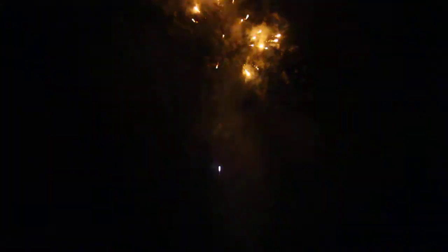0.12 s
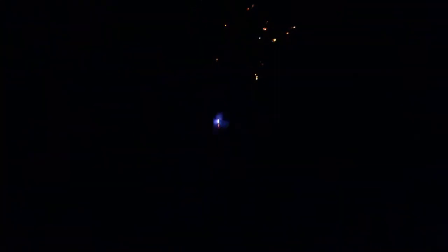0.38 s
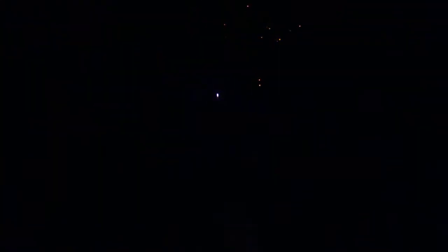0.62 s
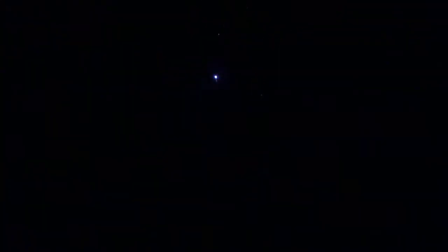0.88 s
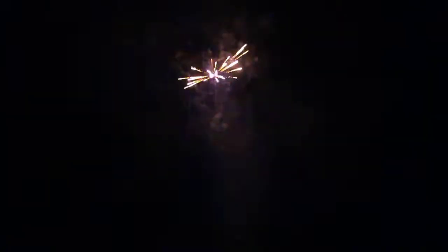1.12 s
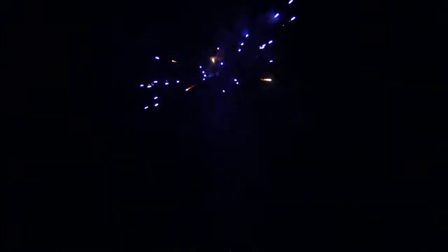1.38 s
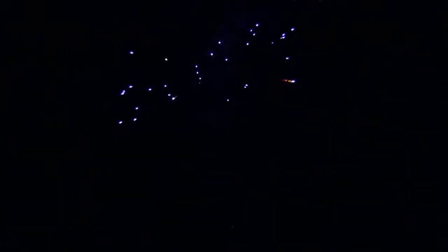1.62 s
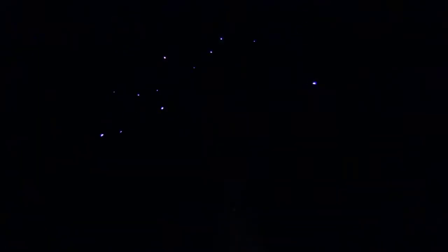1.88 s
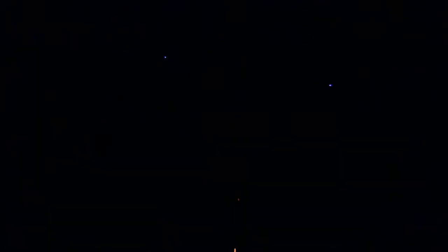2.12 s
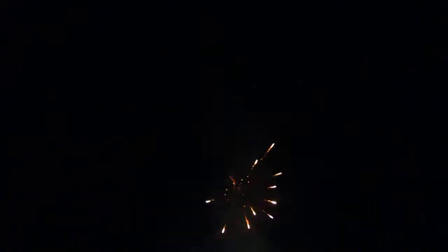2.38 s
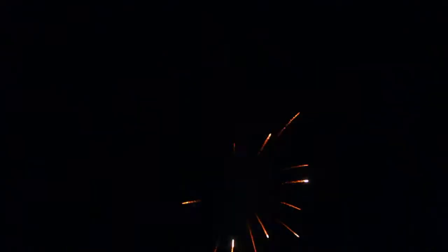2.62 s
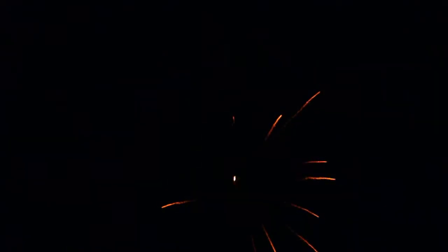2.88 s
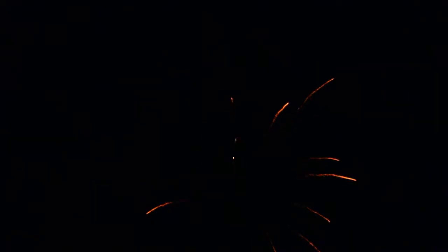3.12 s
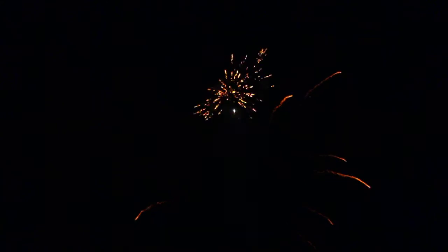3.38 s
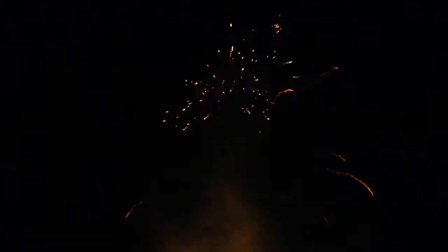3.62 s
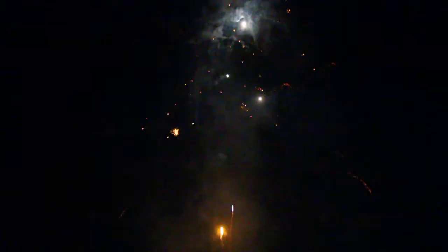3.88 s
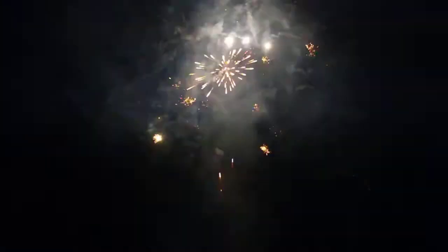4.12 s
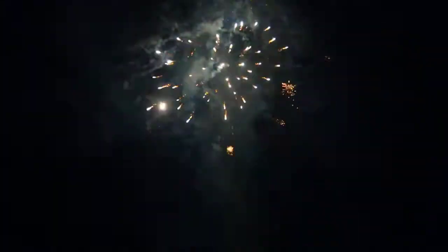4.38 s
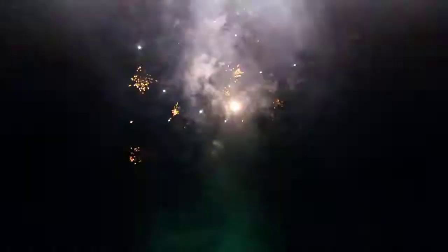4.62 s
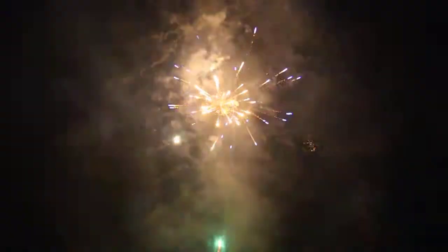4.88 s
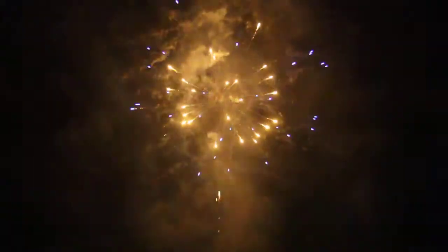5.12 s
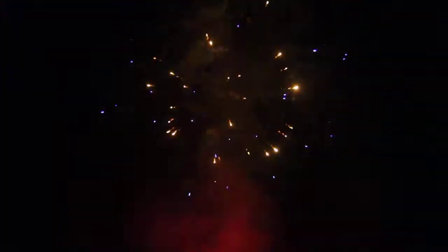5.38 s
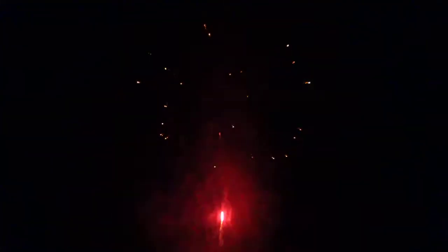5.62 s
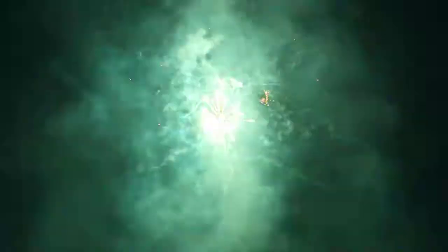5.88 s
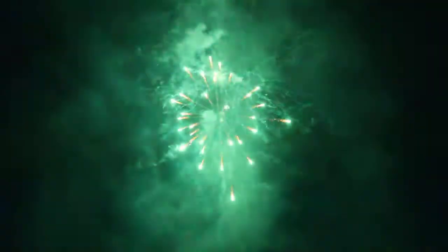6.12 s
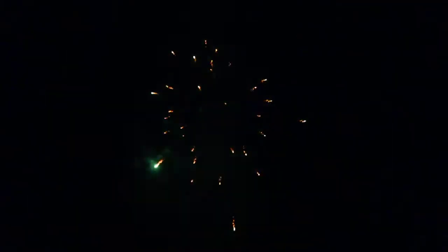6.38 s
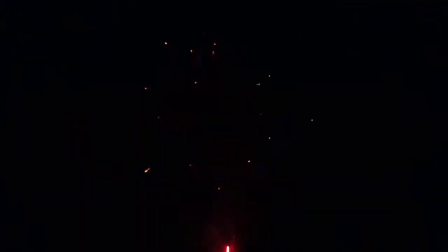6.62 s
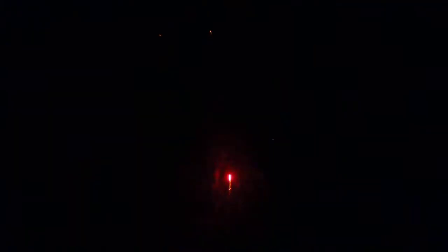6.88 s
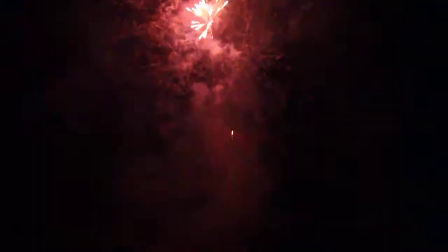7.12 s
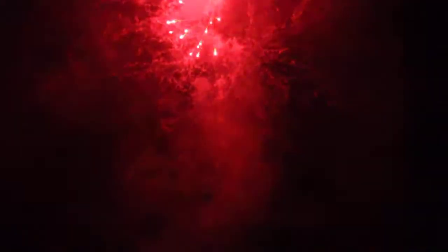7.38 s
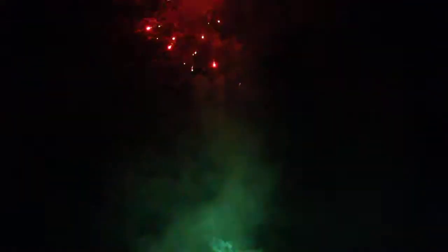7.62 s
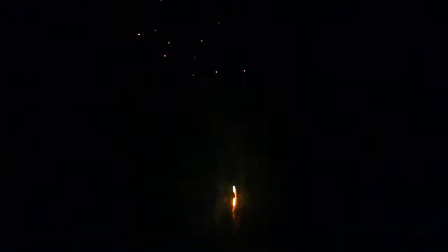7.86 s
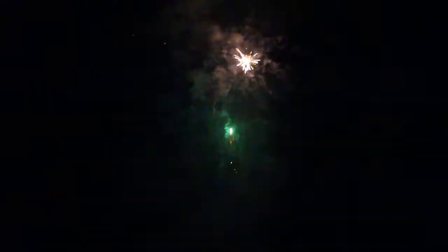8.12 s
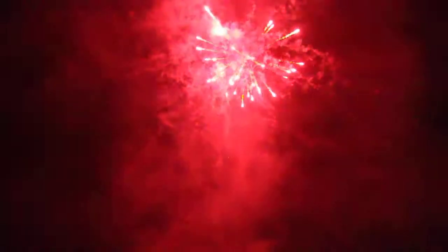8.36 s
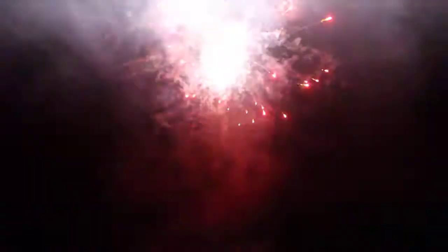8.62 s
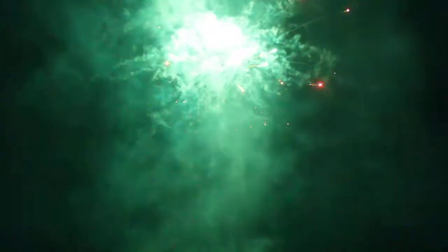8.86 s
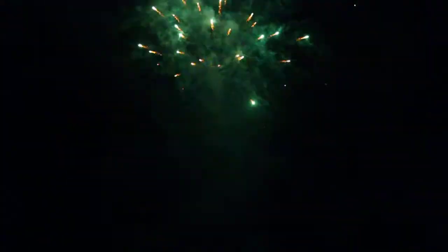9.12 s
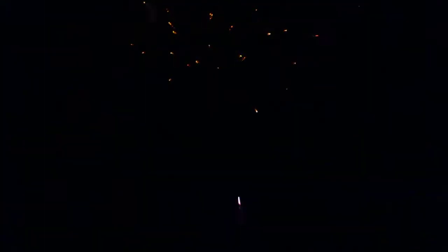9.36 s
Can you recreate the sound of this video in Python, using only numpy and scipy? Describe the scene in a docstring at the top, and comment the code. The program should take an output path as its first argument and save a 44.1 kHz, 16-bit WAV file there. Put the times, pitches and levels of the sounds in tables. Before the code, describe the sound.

Outdoor night fireworks heard close through a small overloading microphone. The roll of an earlier burst fades, then launch tubes thud and huge shells bang overhead, each with wall slaps, a quick falling metallic whistle off a fence and rolling echoes. A rapid crackle fills about four to nearly five seconds; weaker bursts, then stronger bangs, then a last thud.

```python
"""Night fireworks close to a small microphone: it opens on the roll of a shell that burst just before.
Then tubes some way off thud and shells burst overhead; each blast overloads the microphone, comes back off
ground and near walls, whistles down a ribbed fence, slaps off far walls and rolls round distant buildings.
Just before four seconds a volley of tiny sharp blasts crackles, densest until about 4.7 s.
Weaker bursts follow, then stronger ones again, and a last tube thuds over a steady night rumble and hiss."""
import sys
import numpy as np
from scipy import signal
from scipy.fft import rfft, irfft
from scipy.io import wavfile
from scipy.ndimage import uniform_filter1d

SR = 44100
rng = np.random.default_rng(int(sys.argv[2]) if len(sys.argv) > 2 else 0)


def unload_wav(signal):
    """Save mono or channel-first audio to the path in sys.argv[1] as 16-bit WAV at rate SR, clipped to [-1, 1]."""
    wavfile.write(
        sys.argv[1],
        SR,
        np.round(np.clip(np.atleast_2d(signal).T, -1, 1) * 32767).astype(np.int16),
    )


def attenuation_scalar(level_db):
    """Turn a level in dB into a linear amplitude multiplier (20 dB per decade)."""
    decades = np.asarray(level_db, float) / 20
    return 10 ** decades


N = 418509
LEAD = SR  # samples of run-up before the start, so earlier blasts can feed the echoes


def band(x, lo_hz, hi_hz, order=2):
    """Band-pass."""
    return signal.sosfilt(signal.butter(order, [lo_hz, min(hi_hz, SR / 2.2)], "band", fs=SR, output="sos"), x)


def train(s, gain, size=N + LEAD, lead=LEAD):
    """Impulses at times s, each shared between two samples."""
    out = np.zeros(size + 1)
    at = np.clip(np.asarray(s) * SR + lead, 0, size - 1)
    np.add.at(out, at.astype(int), gain * (1 - at % 1))
    np.add.at(out, at.astype(int) + 1, gain * (at % 1))
    return out[:size]


def ring(x, shape):
    """Convolve and keep the length."""
    return signal.oaconvolve(x, shape)[:len(x)]


def wander(size):
    """Random levels held for size samples and slewed."""
    held = np.repeat(rng.standard_normal((N + LEAD) // size + 1), size)
    return uniform_filter1d(held, size)[:N + LEAD]


# spectrum of the night air: f/Hz, relative level/dB per Hz
NIGHT_SPECTRUM = [(18, -69), (30, -66), (158, -9), (374, -42.5), (645, -13), (1090, -4.5), (3320, -5.5),
                  (15000, -40)]
NIGHT_DB = -47  # rms


def night():
    """Steady far-off rumble and hiss: white noise shaped in the spectrum."""
    hz = np.fft.rfftfreq(N + LEAD, 1 / SR)
    at, db = np.transpose(NIGHT_SPECTRUM)
    colour = attenuation_scalar(np.interp(np.log(hz + 1), np.log(at), db))
    x = irfft(rfft(rng.standard_normal(N + LEAD)) * colour, N + LEAD)
    return attenuation_scalar(NIGHT_DB) * x / x.std()


# groups of houses swell the roll up to their far wall, then it drops: t/s, build-up/s, level/dB
HOUSE_SWELLS = [(0.279, 0.029, 1.5), (.545, 0.13, -11.5)]
CLUTTER_S, CLUTTER_WIDE_S = .010, .004
STREET_S, STREET_RISE_S, STREET_DB, STREET_T60_S = 0.065, 0.0054, 5, 0.23
TOWN_DB, TOWN_T60_S, HILLS_DB = -2.5, 3.52, -18
LULL_DB = -17.5  # early echoes before the street answers, relative to its level


def scatter(t):
    """Echo power t seconds after a blast: close clutter, then the street, and the swells of far houses."""
    def gate(at, rise):
        return 1 / (1 + np.exp(np.clip((at - t) / rise, -50, 50)))

    def fading(db, t60):
        return attenuation_scalar(2 * (db - 60 * (t - STREET_S) / t60))

    clutter = np.exp(-((t - CLUTTER_S) / CLUTTER_WIDE_S) ** 2 / 2)
    street = fading(STREET_DB, STREET_T60_S) + fading(TOWN_DB, TOWN_T60_S) + attenuation_scalar(2 * HILLS_DB)
    street = (attenuation_scalar(2 * LULL_DB) + gate(STREET_S, STREET_RISE_S)) * street
    houses = 0
    for at, build, db in HOUSE_SWELLS:
        houses = houses + attenuation_scalar(2 * db) * np.exp(-np.abs(t - at) / build) * (1 - gate(at, 0.0097))
    return clutter, street, houses


# colour of the roll: band centre f/Hz, level/dB, extra fading/(dB per s), negative lingers
ROLL_COLOUR = [(92, -13.5, 2), (165.5, -5.5, -2.5), (284, 2, 0.5), (482, -0.5, 0), (786, -4, -1),
               (1320, -3, 3), (2300, -5, 16), (3900, -10, 34), (6140, -9.5, 75), (10400, -39.5, 1),
               (14000, -35, 11)]
ROLL_S = 2
LUMPS_DB, BASS_SWELLS_DB = 2, 2.5
CLUTTER_DB, CLUTTER_DB_PER_DB, STAR_CLUTTER_DB = -15.5, 0.48, -25  # shell clutter follows the blast


def roll(star_s, star_db):
    """Dense uneven echoes of every blast; air and distance take the treble first."""
    shell_s, blast_db, roll_db, _, early = np.transpose(SHELL_BURSTS)
    lift_s, thud_db, *_ = np.transpose(LIFT_CHARGES)
    # impulses carry power, hence the doubled dB
    big = train(shell_s, attenuation_scalar(2 * roll_db)) + train(lift_s, attenuation_scalar(2 * (thud_db - 57.0)))
    far = train(shell_s - early, attenuation_scalar(2 * roll_db))
    small = train(star_s, attenuation_scalar(2 * (star_db - 36)))
    close = train(shell_s, attenuation_scalar(2 * (CLUTTER_DB + CLUTTER_DB_PER_DB * blast_db)))
    close_small = train(star_s, attenuation_scalar(2 * (star_db + STAR_CLUTTER_DB)))
    t = np.arange(int(ROLL_S * SR)) / SR
    clutter, street, houses = scatter(t)
    # walls of unequal size: lumps of a few milliseconds, broader swells in the bass
    lumps, swells = wander(size=160), wander(size=700)
    grain = rng.standard_normal(len(big))
    out = 0
    for hz, db, fade_db in ROLL_COLOUR:
        uneven_db = LUMPS_DB * lumps + BASS_SWELLS_DB * swells * min(600 / hz, 1)
        noise = band(grain * attenuation_scalar(uneven_db), hz / 1.722, hz * 1.39)
        colour = attenuation_scalar(2 * (db - fade_db * t))
        thin = (hz / (hz + 1200)) ** 2  # small blasts carry little bass
        power = ring(big + small * thin, street * colour)
        power = power + ring(far, houses * colour)
        power = power + ring(close + close_small * thin, (clutter * colour)[:SR // 20])
        out = out + noise / noise.std() * np.sqrt(np.abs(power))
    return out


# far walls that slap every shell back: lag t/s, level over the roll/dB, centre f/Hz
FAR_WALLS = [(.197, 3, 1700), (.254, 5, 1500), (.270, 10, 1350), (.534, 5, 1150), (.602, 2, 1150)]
# stray slaps: t/s, peak level/dB, centre f/Hz
STRAY_SLAPS = [(0.034, -27, 1460), (0.484, -16.5, 1280), (5.628, -25, 1280), (6.009, -8.5, 2100),
               (6.428, -18, 1310), (6.652, -23, 1320), (6.854, -27, 1340)]
# a small far wall facing the tubes ticks after every lift: lag, peak level, centre
TUBE_WALL_S, TUBE_WALL_DB, TUBE_WALL_HZ = .361, -23, 3500


def slaps():
    """Far walls return a few milliseconds of scattered sound around a centre pitch."""
    rows = []
    for s, _, roll_db, _, early in SHELL_BURSTS:
        rows += [(s + lag - early, roll_db + db, hz) for lag, db, hz in FAR_WALLS]
    rows += [(s + TUBE_WALL_S, TUBE_WALL_DB, TUBE_WALL_HZ) for s, *_ in LIFT_CHARGES]
    rows += list(STRAY_SLAPS)
    out, t = np.zeros(N + 2 * LEAD), np.arange(1024) / SR
    for (s, db, hz), noise in zip(rows, rng.standard_normal((len(rows), 1024))):
        puff = noise * t * np.exp(-t / .0015)
        # small walls lose the bass, distance takes the top
        slap = band(puff, max(hz / 4, hz - 1200), min(hz * 2.4, 4500))
        at = int(s * SR) + LEAD
        out[at:at + 1024] += attenuation_scalar(db) * slap / np.abs(slap).max()
    return out[:N + LEAD]


# lift charges in the tubes: t/s, thud level/dB, crack level/dB, wall echo level/dB
LIFT_CHARGES = [(0.6679, 17, 8, -16), (1.8339, 20.5, 17, -17.5), (3.46, -1, 1, -17), (3.5384, 3, 3, -16),
                (4.502, -5.5, -3, -3.5), (5.335, -3.5, -1.5, -7.5), (6.391, 4.5, 2.5, -11),
                (7.496, 10, 9, -13), (7.53, 5, 4.5, -7), (9.073, 0, 4.5, -9)]


def lifts():
    """The tube thuds with a short ring falling in pitch and its own noisy crack; two wall echoes follow."""
    out, t = np.zeros(N + LEAD), np.arange(1400) / SR
    thud = -np.sin(2 * np.pi * 290 * t * (1 + np.exp(-t / .0015))) * np.exp(-t / .0036)
    walls = train([.0675, .0755], attenuation_scalar(np.array([-3, 0])), size=4000, lead=0)
    noises = rng.standard_normal((len(LIFT_CHARGES), 1400))
    for (s, thud_db, crack_db, echo_db), noise in zip(LIFT_CHARGES, noises):
        crack = band(noise * np.exp(-t / 0.004), 870, 2920)
        lift = attenuation_scalar(thud_db) * thud + attenuation_scalar(crack_db) * crack
        echoes = band(np.convolve(walls, lift), 68, 11000, order=1)
        at = int(s * SR) + LEAD
        out[at:at + 1400] += lift
        out[at:at + 5399] += attenuation_scalar(echo_db) * echoes
    return out


def blast(push_s, fade_s):
    """Pressure jump, then a longer suction; the microphone shows it upside down."""
    t = np.arange(int(12 * fade_s * SR)) / SR
    return -(1 - t / push_s) * np.exp(-t / fade_s)


# ground and near walls: lag t/s, level for shells/dB, level for stars/dB, treble limit f/Hz
NEAR_WALLS = [(.0037, -3, -20, 8000), (.0064, -4, -4, 6000), (.0082, -5, -14, 6000), (.0104, -7, -7, 4500),
              (.0122, -18, -16, 5000)]


def near_walls(x, column):
    """The sound and its few close echoes, each duller and followed by a little scatter."""
    out, t = x.copy(), np.arange(300) / SR
    for row in NEAR_WALLS:
        spray = band(rng.standard_normal(300), 1580, 5700, order=1) * np.exp(-t / 0.00093)
        echo = ring(np.roll(x, int(row[0] * SR)), (t == 0) + 0.32 * spray)
        out += attenuation_scalar(row[column]) * band(echo, 22, row[3], order=1)
    return out


# pitch the whistle falls towards, and echo time to the nearest point of the fence and back
FENCE_HZ, FENCE_AWAY_S = 1750, .13


def fence(s, lag, db):
    """Every rib sends back a click; the spacing in time widens along the fence, so the whistle falls."""
    rib = np.arange(60, 420)
    late = np.hypot(FENCE_AWAY_S, rib / FENCE_HZ) - FENCE_AWAY_S
    # the near end is hidden, the fence ends a fixed way off
    fade_in = np.clip(np.minimum(late - .012, late + lag - .026) / .014, 0, 1) ** 2
    fade_out = np.clip((.125 - lag - late) / .03, 0, 1)
    # clicks weaken by 120 dB per s, each rib with its own strength
    keep = fade_in * fade_out * attenuation_scalar(-120 * late + 4.5 * rng.standard_normal(len(rib)))
    # the far edge of each rib answers with the other sign, nearly half a period on
    edge = late + .43 * np.gradient(late)
    return train(s + lag + np.r_[late, edge], attenuation_scalar(db) * np.r_[keep, -.6 * keep])


# the loudest crackling stars: t/s, relative level/dB
LOUD_STARS = [(3.9031, 0), (3.9172, 0), (3.976, 0), (4.0112, 0), (4.0192, 0), (4.0606, -1), (4.07, 0),
              (4.0836, 0), (4.0976, -1), (4.132, -2), (4.1413, -1), (4.2101, -7), (4.2248, -6),
              (4.2731, -5), (4.2878, -4), (4.2923, -3), (4.3106, -5), (4.3509, -6), (4.3646, -5),
              (4.3843, -6), (4.4002, -5), (4.4163, -5), (4.4514, -3), (4.4919, -3), (4.5559, -5),
              (4.5644, -2), (4.5787, -3), (4.5967, -3), (4.6085, -4), (4.637, -5), (4.6443, -5),
              (4.6948, -4), (5.0787, -6), (5.1122, -7), (5.3117, -4)]
# while the volley is dense each star has two weaker neighbours, 2 ms to 24 ms after it
DENSE_FROM_S, DENSE_TO_S, NEIGHBOUR_S = 4.05, 4.7, .022
NEIGHBOUR_DB, NEIGHBOUR_SPREAD_DB = -2, 9  # highest level under the star, half the range below that


def volley():
    """Times and levels of all stars: the loud ones and their chance neighbours."""
    s, db = np.repeat(np.transpose(LOUD_STARS), 2, axis=1)
    after, size = rng.random((len(s), 2)).T
    dense = (s > DENSE_FROM_S) & (s < DENSE_TO_S)
    weaker = NEIGHBOUR_DB - 2 * NEIGHBOUR_SPREAD_DB * size
    all_s = np.r_[s[::2], (s + .002 + NEIGHBOUR_S * after)[dense]]
    all_db = np.r_[db[::2], (db + weaker)[dense]]
    return all_s, all_db


def stars(s, db):
    """Tiny sharp blasts with close echoes; the fence answers faintly."""
    hits = train(s, attenuation_scalar(db))
    ribs = fence(-LEAD / SR, .022, -30)[:SR // 8]  # moved to sample 0 to serve as an echo pattern
    pops = attenuation_scalar(3.5) * band(ring(hits, blast(.0001, .00011)), 300, 12000, order=1)
    return near_walls(pops, column=2) + ring(ring(hits, ribs), np.hanning(9))


# shell bursts: t/s, blast level/dB, roll level/dB, fence lag/s, lead of the far-wall echoes/s
SHELL_BURSTS = [(-.249, 20, -16, .02, 0), (1.1511, 30.5, -14, .024, 0), (2.2790, 24.5, -17.5, -.007, 0),
                (3.333, 25, -15.5, .020, .002), (4.1628, 5, -26, .024, 0), (4.7612, 2.5, -22.5, .011, 0),
                (4.8923, 4.5, -32, .015, .003), (5.9090, 13.5, -20.5, .012, 0),
                (7.1570, 20.5, -18.5, .030, .008), (8.2445, 19.5, -18.5, .022, -.005),
                (8.773, 17.5, -19.5, .019, .003)]
FENCE_DB, FENCE_DB_PER_DB = -18.5, .33  # louder blasts, louder whistle


def shells():
    """Blasts with their close echoes, a low boom between the walls, and the fence."""
    s, blast_db, _, lag, _ = np.transpose(SHELL_BURSTS)
    hits, t = train(s, attenuation_scalar(blast_db)), np.arange(2048) / SR
    boom = attenuation_scalar(-9) * np.sin(2 * np.pi * 310 * t) * (t / .004) ** 2 * np.exp(-t / .0019)
    whistle_db = FENCE_DB + FENCE_DB_PER_DB * blast_db
    whistle = sum(fence(*row) for row in zip(s, lag, whistle_db))
    blasts = band(ring(hits, blast(0.00045, 0.00089)), 31, 20000, order=1)
    return near_walls(blasts, column=1) + ring(hits, boom) + ring(whistle, np.hanning(9))


def scene():
    """All sources; the second before the start only feeds the echoes."""
    crackle = volley()
    mix = night() + roll(*crackle) + slaps() + lifts() + stars(*crackle) + shells()
    return mix[None, LEAD:]


def low_pass(x):
    """Removes everything above the highest recorded frequency."""
    return signal.sosfilt(signal.butter(12, 16650, fs=SR, output="sos"), x)


def record(dry):
    """The port sheds deep bass, the capsule saturates, slow gain control follows, the converter clips."""
    x = signal.sosfilt(signal.butter(2, 70, "high", fs=SR, output="sos"), dry)
    x = np.clip(x, -.9, 1.1)
    # the bass cut makes the clipped plateaus sag
    x = signal.lfilter(*signal.butter(1, 130, "high", fs=SR), x)
    # gain control: loudness averaged over .35 s turns the level down
    hold = np.exp(-1 / (.35 * SR))
    loud = signal.lfilter([1 - hold], [1, -hold], x ** 2)
    x = x * attenuation_scalar(2.0) / (1 + loud / attenuation_scalar(2 * -18)) ** 0.24
    x = signal.sosfilt(signal.butter(2, 15000, fs=SR, output="sos"), x)
    mix = np.clip(x, -1, 1)
    return low_pass(mix)


dry = scene()
out = record(dry)
unload_wav(out)
```